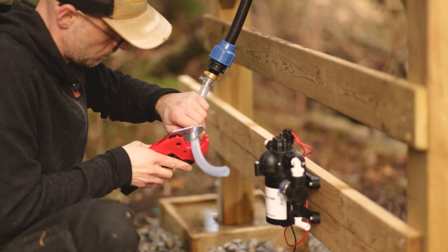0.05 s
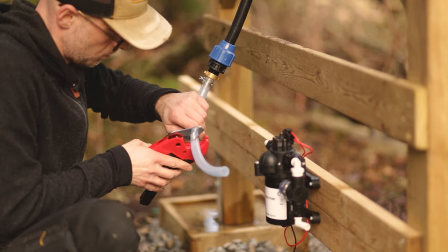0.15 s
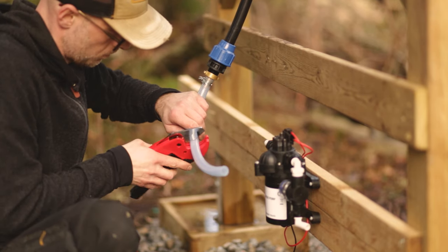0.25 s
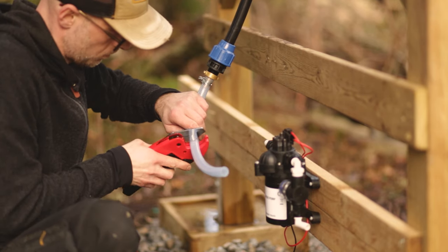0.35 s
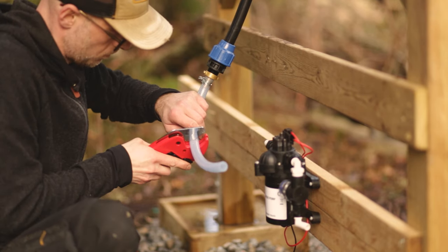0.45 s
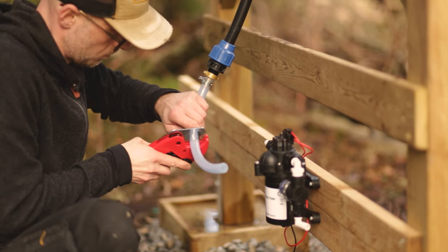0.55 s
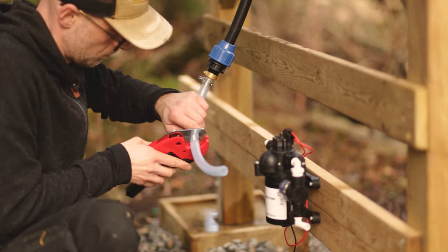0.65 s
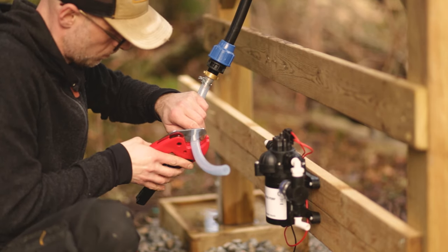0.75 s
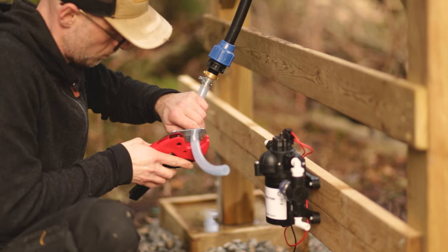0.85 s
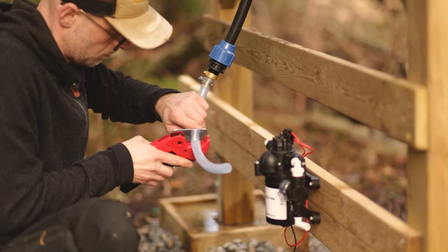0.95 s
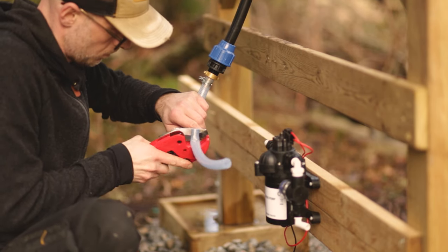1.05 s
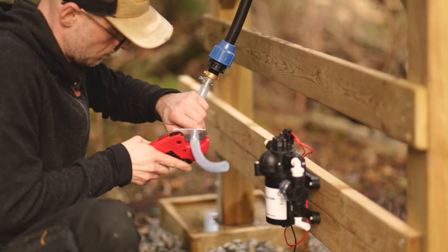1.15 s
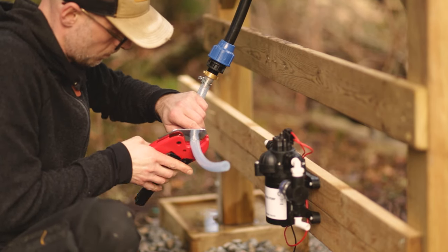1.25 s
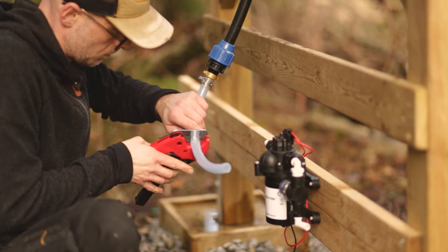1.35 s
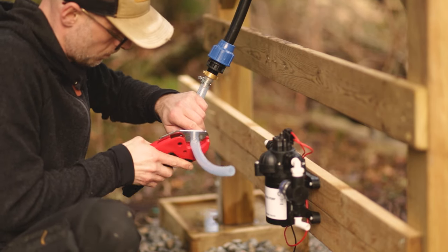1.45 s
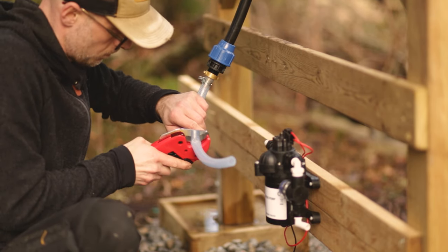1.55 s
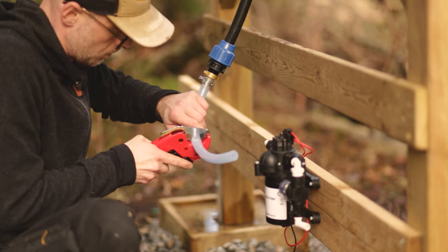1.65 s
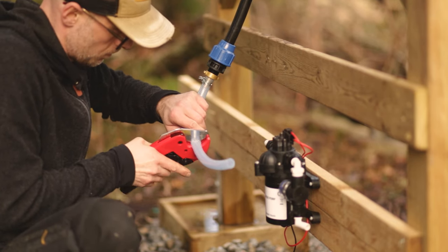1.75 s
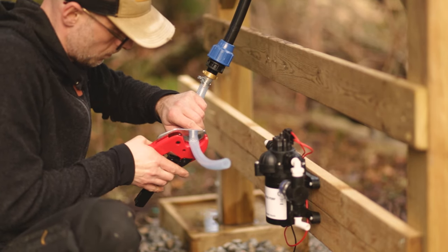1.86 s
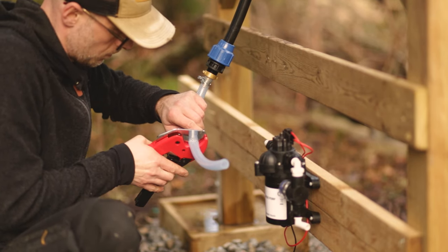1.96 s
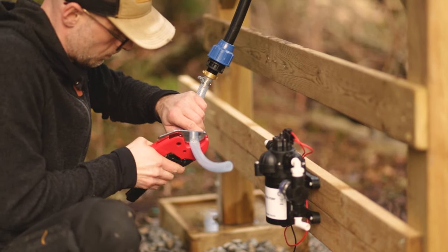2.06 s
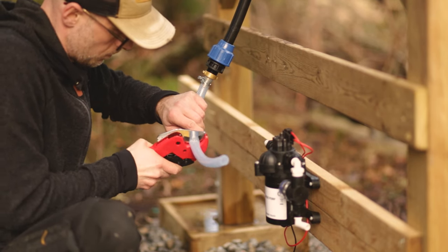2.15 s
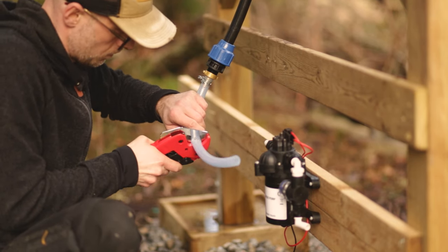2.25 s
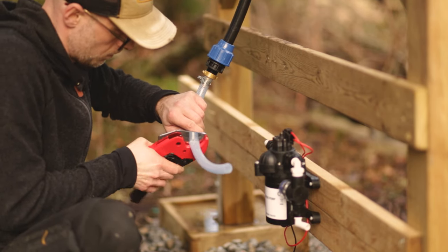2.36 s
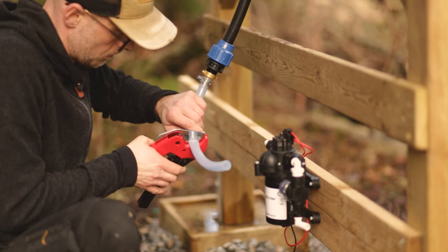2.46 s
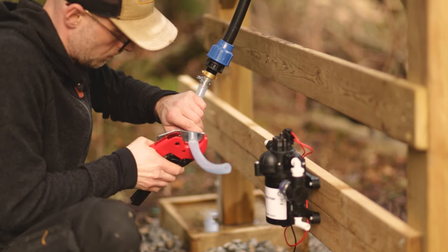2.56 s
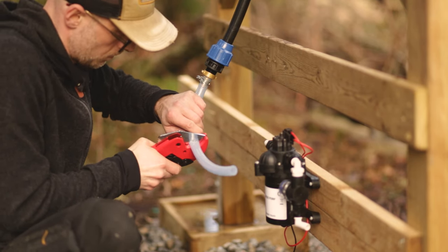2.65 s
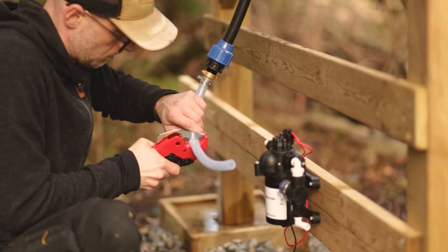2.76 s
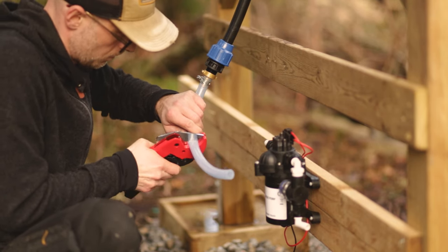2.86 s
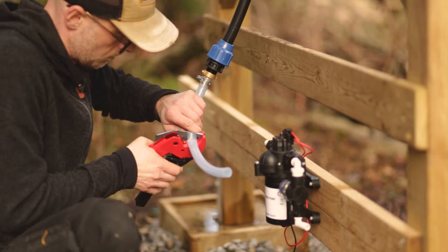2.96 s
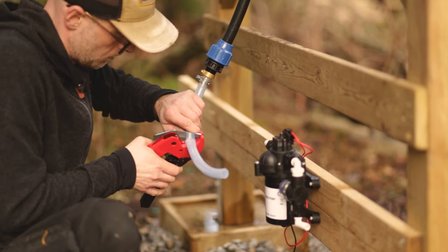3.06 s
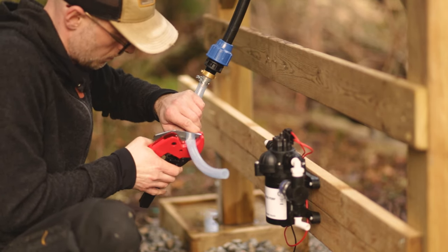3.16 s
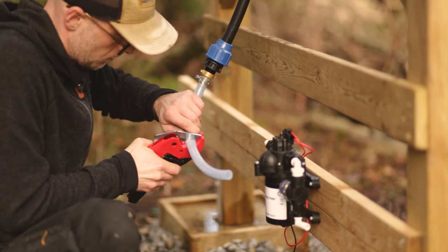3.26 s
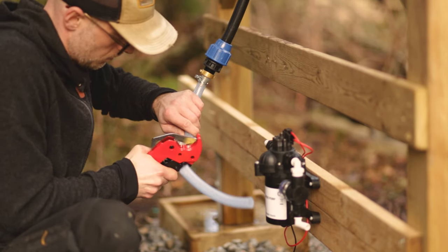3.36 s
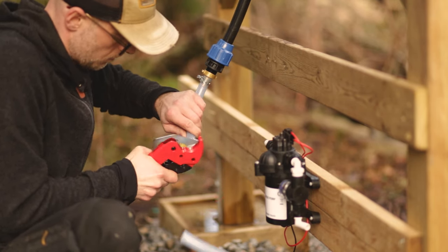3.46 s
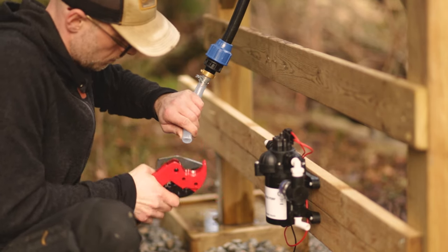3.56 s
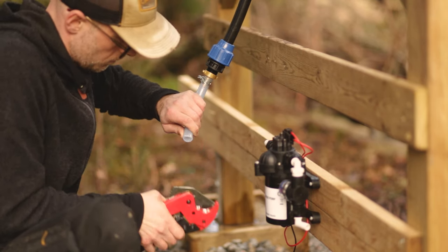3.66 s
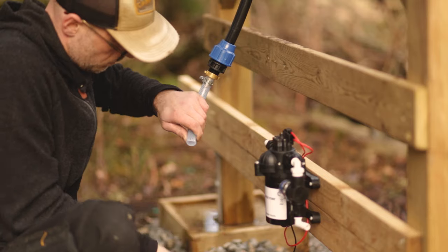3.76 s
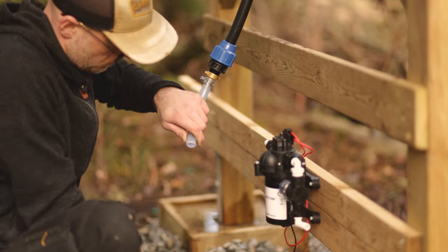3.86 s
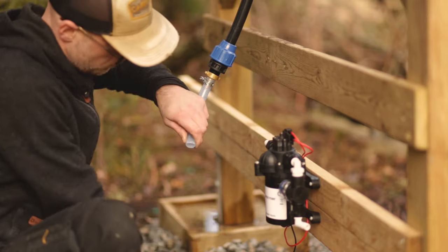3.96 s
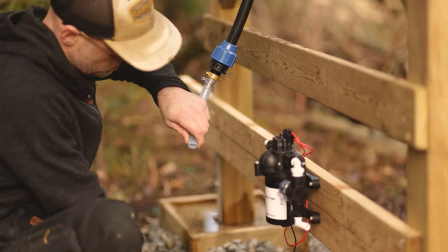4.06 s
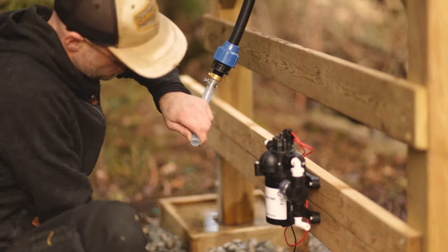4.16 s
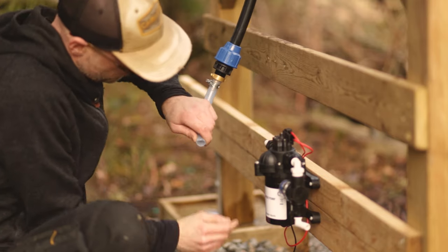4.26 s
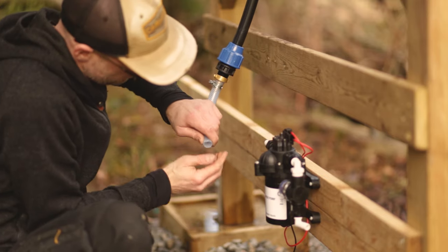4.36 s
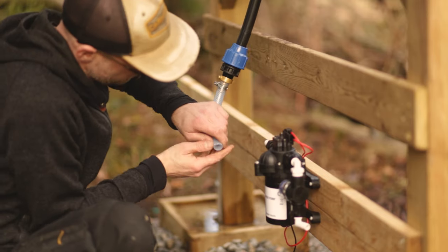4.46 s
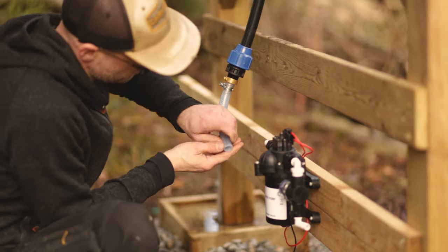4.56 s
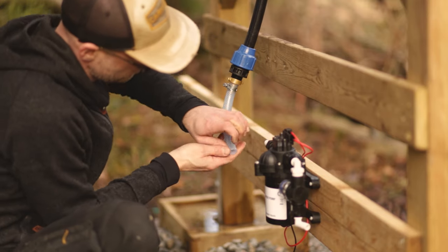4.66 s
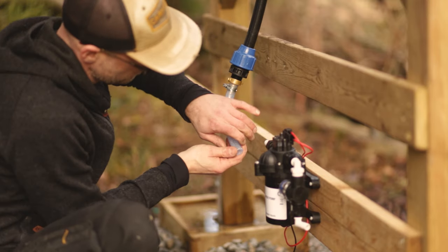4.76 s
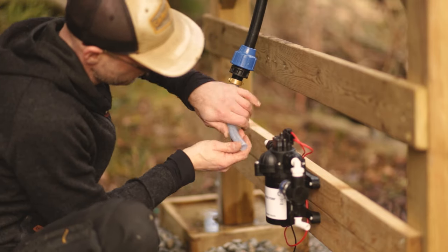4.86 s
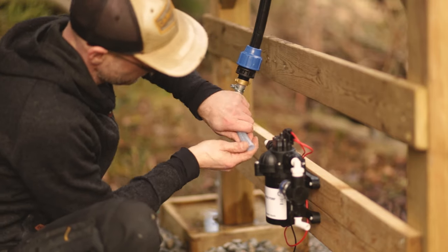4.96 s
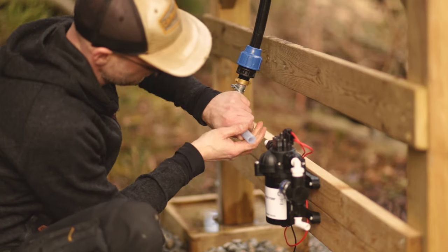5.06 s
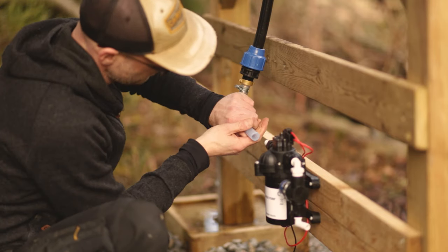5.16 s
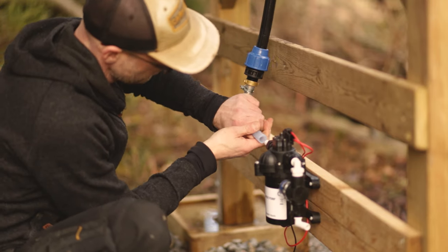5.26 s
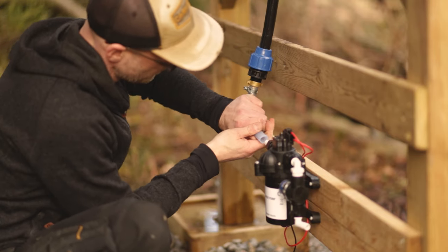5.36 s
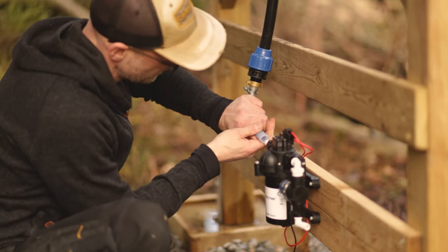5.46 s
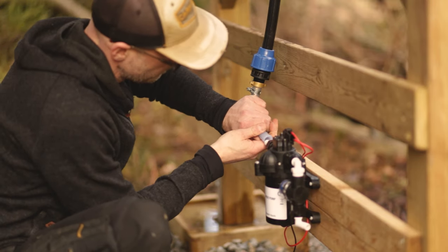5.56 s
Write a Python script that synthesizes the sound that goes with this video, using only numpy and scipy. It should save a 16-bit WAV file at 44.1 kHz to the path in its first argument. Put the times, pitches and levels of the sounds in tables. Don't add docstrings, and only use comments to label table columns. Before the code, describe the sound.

A hand tool clicks unevenly about four times a second, squeaks and creaks, cracks through plastic tubing, then is set down on stones.

```python
import sys
import numpy as np
from scipy import signal
from scipy.io import wavfile
from scipy.ndimage import uniform_filter1d

SR = 44100
rng = np.random.default_rng(int(sys.argv[2]) if len(sys.argv) > 2 else 0)


def digitize_waveform(pressure):
    field = np.atleast_2d(pressure).T
    bounded = np.clip(field, -1, 1)
    quanta = np.round(bounded * 32767).astype(np.int16)
    wavfile.write(sys.argv[1], SR, quanta)


def how_loud(loudness_db):
    steps = np.asarray(loudness_db, float) / 20
    return 10 ** steps


N = 247842

# hz, density_db (dB per Hz)
PLASTIC = [(710, -54), (1200, -30.5), (3110, -4), (3870, -7.5), (4450, -2), (5840, -6.5), (6440, -2.5),
           (11300, -3), (16000, -17)]


def evened(x):
    return x / np.sqrt(np.mean(x ** 2) + 1e-20)


def read(points, hz):
    f, value = np.transpose(points)
    return np.interp(np.log(hz + 1), np.log(f + 1), value)


def add(mix, s, sound):
    at = round(s * SR)
    sound = sound[..., max(-at, 0):]
    part = mix[:, max(at, 0):][:, :np.shape(sound)[-1]]
    part += sound[..., :part.shape[1]]


def colour(x, points):
    log_gain = np.log(how_loud(read(points, abs(np.fft.fftfreq(1024, 1 / SR)))))
    taps = np.fft.ifft(np.exp(np.conj(signal.hilbert(log_gain)))).real[:512]
    filtered = signal.fftconvolve(np.atleast_2d(x), taps[None], axes=1)
    return filtered[:, :np.shape(x)[-1]].reshape(np.shape(x))


def ring(x, hz, width_hz):
    r = np.exp(-np.pi * width_hz / SR)
    return signal.lfilter([1 - r, 0, r - 1], [1, -2 * r * np.cos(2 * np.pi * hz / SR), r * r], x)


def hit(db, hz, low_db, high_db, ms, body_db, ring_db, fade_ms):
    # hz, width_hz, level_db
    modes = [(3060, 110, 4.5), (4830, 160, -11.5), (6320, 410, -7), (6950, 530, -3), (7910, 370, 3.5),
             (8300, 200, -3), (9700, 340, -17.5), (12200, 300, 0), (14200, 340, -18.5)]
    t_ms = np.arange(1400) / SR * 1000
    luck, size = rng.random(len(t_ms)), rng.standard_normal(len(t_ms))
    fade = np.exp(-np.maximum(t_ms - ms, 0) / fade_ms)
    chatter = size * (0.35 + (luck < .2)) * fade * np.minimum(t_ms / 0.27, 1)
    shape = [(500, low_db - 25.5), (1300, low_db - 7.5), (2300, low_db), (3500, low_db + 4.0),
             (5000, -13.5), (8500, -11.0),
             (10500, high_db), (14500, high_db - 7.5), (16000, high_db - 18.0)]
    crack, away = colour(np.array([chatter, t_ms == 0]), shape)
    crack, away = evened(crack), evened(away)
    body = how_loud(body_db) * evened(sum(how_loud(d) * ring(crack, f, w) for f, w, d in modes))
    loudest = how_loud(ring_db) * evened(ring(ring(chatter, hz, 1400), hz, 1400))
    toward = crack + body + loudest
    around = 1.1 * away + .4 * loudest + 1.2 * body
    return how_loud(db) * np.array([toward, around]) / abs(toward).max()


def tick(db, hz, low_db, high_db, ms):
    return hit(db, hz, low_db, high_db, ms, body_db=-18.5, ring_db=-5.0, fade_ms=2.9)


def knock(db, hz, t60):
    t = np.arange(9000) / SR
    tone = how_loud(db - 60 * t / t60) * np.sin(2 * np.pi * hz * t) * np.minimum(t * hz / .7, 1)
    return np.outer([1, .35], tone)


def slips(rows, tone, hiss_db, smear):
    s, *columns = np.transpose(rows)
    t = np.arange(s[0], s[-1], 1 / SR)
    rate, db, uneven = (np.interp(t, s, c) for c in columns)
    wobble, grit = rng.standard_normal((2, len(t)))
    turns = np.cumsum(rate * np.exp(uneven * evened(uniform_filter1d(wobble, 60)))) / SR
    lag = smear * rng.standard_normal(90)
    pulses = sum(np.cos(2 * np.pi * k * turns + lag[k]) * (k * rate < 17000) for k in range(1, 90))
    pulses = pulses / np.sqrt(np.maximum(17000 // rate, 1) / 2)
    puffs = grit * (0.27 + np.exp(-(turns % 1) / 0.25))
    drive = pulses + how_loud(hiss_db) * puffs
    return s[0], how_loud(db) * evened(colour(drive, tone)) * signal.windows.tukey(len(t), .03)


def pawl_clicks(tool):
    # start_s, peak_db, ring_hz, low_db, high_db
    clicks = [(0.182, -9, 4000, -17.5, -10.5), (0.1913, -18.5, 4450, -13, -11),
              (0.4722, -21.5, 8900, -19, -7.5), (0.7477, -8, 7480, -16, -9), (1.043, -19.5, 5280, -25, -11),
              (1.304, -11, 7600, -18.5, -12), (1.6001, -17, 5020, -21, -7), (1.8658, -8.5, 7430, -20.5, -7),
              (2.1816, -13.5, 11100, -25, -12.5), (2.416, -7, 12200, -19, -9),
              (2.7239, -18, 11800, -20.5, -15), (3.023, -11, 7440, -24, -9.5)]
    for s, *row in clicks:
        add(tool, s, hit(*row, ms=2.82, body_db=-9.5, ring_db=-3.5, fade_ms=1.8))


def tube_parting(tool):
    # peak_db, ring_hz, t60_s
    part_modes = [(-24, 70, .025), (-20, 190, 0.013), (-18, 330, .025), (-16.5, 430, 0.015),
                  (-19.5, 760, .012), (-21, 1100, .012), (-15, 1600, .03), (-17, 2350, 0.039),
                  (-20, 2300, .05), (-19.5, 6600, .05), (-8.5, 7200, .045), (-22, 10530, .03)]
    part_s, lag_s = 3.3482, .0015
    add(tool, part_s, hit(4, 5000, -12, -11.5, ms=3.6, body_db=-8.5, ring_db=-12.5, fade_ms=2.7))
    for mode in part_modes:
        add(tool, part_s + lag_s, knock(*mode))


def small_snaps(tool):
    # start_s, peak_db, ring_hz, brightness_db
    snaps = [(1.7964, -38.5, 3160, -5.5), (2.2452, -26.5, 10200, 9), (2.2558, -41, 7140, 3),
             (2.2777, -31, 7230, 8), (2.2916, -38, 6460, 5), (2.625, -38.5, 11200, 1),
             (2.835, -35.5, 4480, -2.5), (3.4, -24, 7780, -8.5), (4.1814, -45, 10700, -2),
             (4.2105, -42.5, 12500, 8.5), (4.221, -25.5, 5440, -1.5), (4.296, -23.5, 6920, 8)]
    for s, db, hz, bright_db in snaps:
        add(tool, s, hit(db, hz, -18 - bright_db, -13.5 + bright_db, ms=0.69,
                         body_db=-9.5, ring_db=-9.5, fade_ms=.8))


def pin_and_knocks(tool):
    # start_s, peak_db, ring_hz, t60_s
    dull = [(3.371, -48.5, 167.3, 0.52), (3.405, -31.5, 288.6, 0.21), (3.406, -34.5, 342, 0.1),
            (3.36, -42, 302, .12), (3.6691, -25, 790, .007), (3.6839, -24.5, 901, 0.0085),
            (4.1918, -31, 254, 0.023), (4.1941, -40, 497, 0.012), (4.1961, -35, 714, 0.014),
            (4.2204, -39, 1150, 0.014), (4.267, -44, 2010, .02)]
    # start_s, peak_db, ring_hz, t60_s
    steel = [(.4741, -36, 5451, .031), (0.4846, -57.5, 5380, 0.11), (.49, -63, 5520, .11),
             (.7491, -39, 7741, 0.041), (1.0451, -45, 5201, .05), (1.3051, -29, 7941, .045),
             (4.1971, -43, 10701, 0.026), (4.2955, -41, 6921, 0.22), (4.3214, -34.5, 6908, 0.16),
             (4.2971, -41.5, 14501, .051)]
    for s, *row in dull + steel:
        add(tool, s, knock(*row))


def blade_in_plastic(tool):
    # start_s, slip_rate_hz, level_db, unevenness (0-1)
    squeak = [(2.12, 2100, -67, 0.08), (2.131, 4800, -56, 0.01), (2.141, 6700, -40.5, .03),
              (2.149, 8900, -46.5, 0.07), (2.169, 8300, -30.5, 0.05), (2.173, 8600, -33.5, 0.22),
              (2.181, 3600, -42, 0)]
    # start_s, slip_rate_hz, level_db, unevenness (0-1)
    judder = [(2.186, 499, -36, 0.43), (2.2, 241.5, -44.5, 0.44), (2.241, 194, -50, 0.44)]
    # start_s, slip_rate_hz, level_db, unevenness (0-1)
    creak = [(2.624, 200, -52, 0.19), (2.642, 552, -52.5, 0.13), (2.657, 1000, -38.5, .03),
             (2.677, 1450, -34, 0.054), (2.68, 1073, -35.5, .05), (2.705, 1570, -35, .05),
             (2.729, 1695, -36.5, 0.085)]
    add(tool, *slips(squeak, PLASTIC, hiss_db=-6, smear=.1))
    add(tool, *slips(judder, PLASTIC, hiss_db=-5, smear=.3))
    add(tool, *slips(creak, PLASTIC, hiss_db=-7, smear=.9))


def pawl_slide_and_drag(tool):
    # start_s, slip_rate_hz, level_db, unevenness (0-1)
    slide = [(1.587, 11000, -60, .02), (1.594, 6500, -48, 0.1), (1.6, 5800, -42, .05)]
    # start_s, slip_rate_hz, level_db, unevenness (0-1)
    drag = [(1.61, 500, -54, .3), (1.65, 220, -57, 0.32), (1.71, 83, -70, .2)]
    # hz, density_db (dB per Hz)
    drag_tone = [(2000, -40), (5000, -8.5), (8000, -7), (11500, 0), (14000, -5), (16000, -17)]
    add(tool, *slips(slide, PLASTIC, hiss_db=0, smear=.15))
    add(tool, *slips(drag, drag_tone, hiss_db=-1, smear=0.37))


def handle_ticks(tool):
    # start_s, peak_db, ring_hz
    take_up = [(0.1236, -34.5, 4900), (0.6784, -49, 4870), (1.2221, -46, 3460), (1.2494, -58, 3370),
               (1.7664, -38, 4600), (2.3571, -45, 3830), (2.916, -45.5, 4960), (3.2194, -53.5, 8036),
               (3.244, -46, 4687)]
    # start_s, peak_db, ring_hz
    let_go = [(0.0354, -41, 9100), (0.9028, -47.5, 4700), (0.9118, -45.5, 3400), (1.4628, -35, 3600),
              (1.4706, -36, 3060), (2.0539, -45.5, 4830), (2.0622, -29, 4260), (2.5775, -42, 4690),
              (2.589, -34, 4820), (2.6044, -46, 3750), (2.8439, -35.5, 7910), (2.8994, -50.5, 3233)]
    # start_s, peak_db, ring_hz
    leads = [(.174, -36.5, 5000), (.741, -41, 6000), (3.3432, -30, 8000), (3.3457, -16, 6860),
             (3.658, -47, 6900), (4.216, -29, 4380), (4.278, -48, 7900), (4.337, -41, 9000)]
    for s, *row in take_up:
        add(tool, s, tick(*row, low_db=-11, high_db=-27, ms=2.8))
    for s, *row in let_go:
        add(tool, s, tick(*row, low_db=-12.5, high_db=-17.5, ms=3.114))
    for s, *row in leads:
        add(tool, s, tick(*row, low_db=-11.5, high_db=-11.5, ms=3.3))


def gravel_landings(tool):
    # start_s, peak_db, ring_hz, brightness_db
    landings = [(3.6686, -24.5, 5330, 1.8), (3.6837, -25.5, 3224, 4), (3.7968, -46.5, 6110, 2.5),
                (3.8588, -52, 3000, -1), (4.123, -33, 3530, -20), (4.1438, -39.5, 3990, -11),
                (4.1922, -35, 6020, -5), (4.1953, -30, 10400, -1), (4.266, -44, 7050, -7),
                (4.3204, -34, 6880, 6), (4.3413, -41.5, 6880, -8)]
    for s, db, hz, bright_db in landings:
        add(tool, s, tick(db, hz, -14.5 - bright_db, -16.5 + bright_db, ms=2.9))


def stones_and_fingers(tool):
    # start_s, peak_db
    touches = [(4.4157, -54), (4.4404, -51), (4.4804, -50), (4.5076, -51.5), (4.565, -51.5),
               (4.6394, -53.5), (4.9894, -58), (5.1192, -55), (5.3394, -51), (5.4394, -56)]
    for s, db in touches:
        add(tool, s, tick(db, hz=3400, low_db=-18, high_db=-15, ms=2.57))


def rub(rows):
    # hz, density_db (dB per Hz)
    rub_tone = [(710, -39.5), (1200, -10.5), (1510, -13), (1770, 1.5), (2680, -4.5), (7660, -6),
                (15000, -17), (16000, -28.5)]
    s, db = np.transpose(rows)
    t = np.arange(s[0], s[-1], 1 / SR)
    grit = rng.standard_normal(len(t)) * how_loud(2.6 * rng.exponential(1, len(t)))
    level = how_loud(np.interp(t, s, db) - 4.5)
    return s[0], level * evened(colour(grit, rub_tone)) * signal.windows.tukey(len(t), .1)


def hand_rubs(tool):
    # start_s, length_s, level_db, change_db (over the stroke)
    strokes = [(-.012, 0.075, -26, -30), (2.841, .06, -45, -11.5), (3.665, 0.013, -44.5, 2.5),
               (4.119, .03, -44.5, -22), (4.182, 0.038, -50, 5), (4.284, 0.042, -48, -4)]
    rise_s, rise_db, fall_s, fall_db = 0.0055, -6, 0.038, -15
    for start, length, db, change_db in strokes:
        end, end_db = start + length, db + change_db
        add(tool, *rub([(start, db + rise_db), (start + rise_s, db),
                        (end, end_db), (end + fall_s, end_db + fall_db)]))


def at_microphone(toward):
    # hz, left_minus_right_db
    tool_tilt = [(1000, 7), (3000, 4), (8000, 3), (13000, 0)]
    left, right = (colour(toward, [(f, side * db) for f, db in tool_tilt]) for side in (.5, -.5))
    delay = np.sinc(np.arange(-32, 33) - .4) * np.hanning(65)
    return np.array([signal.oaconvolve(left, delay, "same"), right])


def wall_slap(toward):
    # hz, gain_db
    wall_tone = [(800, -13), (2000, -2.5), (8000, -0.2), (11000, -10.5), (16000, -18.5)]
    slap = np.zeros((2, N))
    add(slap, 0.045, colour(toward, wall_tone))
    return how_loud(-29) * slap


def echoes(x, decays, start_s, build_s, wall_s, drop_db):
    hz, t, z = signal.stft(rng.standard_normal((2, SR)), SR, nperseg=128)
    tail = signal.istft(z * how_loud(-60 * t / read(decays, hz)[:, None]), SR, nperseg=128)[1]
    t = np.arange(tail.shape[1]) / SR
    build = np.clip((t - start_s) / build_s, 0, 1)
    tail *= build * how_loud(-drop_db * np.clip((t - wall_s) / 0.0092, 0, 1))
    tail[1] = 0.48 * tail[0] + 0.74 * tail[1]
    return signal.fftconvolve(x[None], tail / np.linalg.norm(tail[0]), axes=1)[:, :N]


def surroundings(away):
    # hz, t60_s
    near_decay = [(1000, .15), (3000, 0.1), (8000, 0.08), (15000, 0.05)]
    # hz, t60_s
    yard_decay = [(1000, 0.36), (3000, .35), (8000, 0.32), (15000, .28)]
    # hz, t60_s
    far_decay = [(500, 0.9), (3000, 1), (8000, 0.61), (15000, .3)]
    near = echoes(away, near_decay, start_s=0.0025, build_s=.004, wall_s=0.073, drop_db=12)
    yard = echoes(away, yard_decay, start_s=.012, build_s=.011, wall_s=.058, drop_db=18)
    far = echoes(away, far_decay, start_s=0.02, build_s=0.034, wall_s=.2, drop_db=.1)
    return how_loud(-9.0) * near + how_loud(-20) * yard + how_loud(-29) * far


def wash():
    # hz, density_db (dB per Hz)
    wash_tone = [(6, 7.5), (15, 7), (25, 0.5), (50, -8.5), (110, -16.5), (250, -16), (550, -14.5),
                 (1100, -16), (2000, -24.5), (4000, -34.5), (8000, -42), (15000, -45), (16500, -52)]
    # hz, likeness (of left and right)
    likeness = [(60, 0.35), (180, 0.52), (550, 0.65), (1650, 0.666), (4970, 0.5), (15000, -0.0)]
    # hz, left_minus_right_db
    wash_tilt = [(60, 1.1), (240, 0.0), (950, -1.5), (3770, -0.11), (15000, 1.0)]
    frames, hz = N // 1024 + 5, np.fft.rfftfreq(4096, 1 / SR)
    a, b, c, d, patches = rng.standard_normal((frames, 2049, 5)).T
    patches = evened(uniform_filter1d(uniform_filter1d(patches, 40, 0), 3, 1))
    swell = evened(uniform_filter1d(rng.standard_normal(frames), 15))
    same = np.clip(read(likeness, hz), -1, 1)[:, None]
    left, other = a + 1j * b, c + 1j * d
    z = np.array([left, same * left + np.sqrt(1 - same ** 2) * other])
    z *= how_loud(read(wash_tone, hz)[:, None] + 0.72 * patches + 0.54 * swell)
    z *= how_loud(np.multiply.outer([.5, -.5], read(wash_tilt, hz)))[:, :, None]
    sound = signal.istft(z, nperseg=4096, noverlap=3072)[1][:, :N]
    return how_loud(-51.5 + 2.5) * evened(sound)


def scene():
    tool = np.zeros((2, N))
    for source in (pawl_clicks, tube_parting, small_snaps, pin_and_knocks, blade_in_plastic,
                   pawl_slide_and_drag, handle_ticks, gravel_landings, stones_and_fingers, hand_rubs):
        source(tool)
    toward, away = tool
    return at_microphone(toward) + wall_slap(toward) + surroundings(away) + wash()


def low_pass(x):
    return signal.sosfilt(signal.butter(12, 16680, fs=SR, output="sos"), x)


def record(dry):
    limited = .8 * np.tanh(dry / .8)
    edge = signal.firwin(255, 16300, window=("kaiser", 9), fs=SR)
    mix = signal.oaconvolve(limited, edge[None], "same")
    return low_pass(mix)


dry = scene()
out = record(dry)
digitize_waveform(out)
```